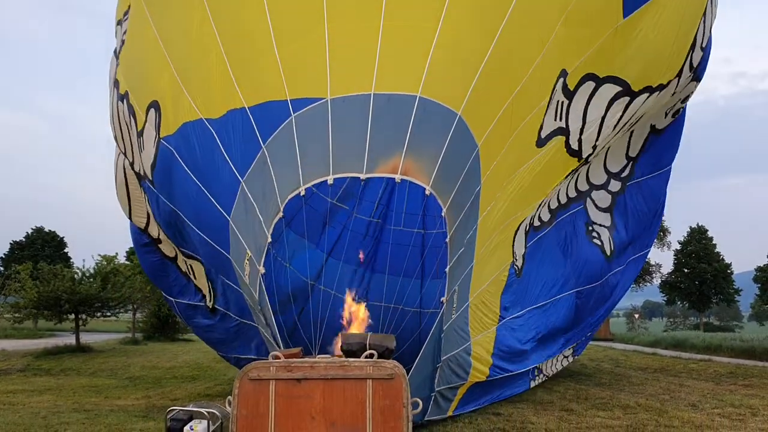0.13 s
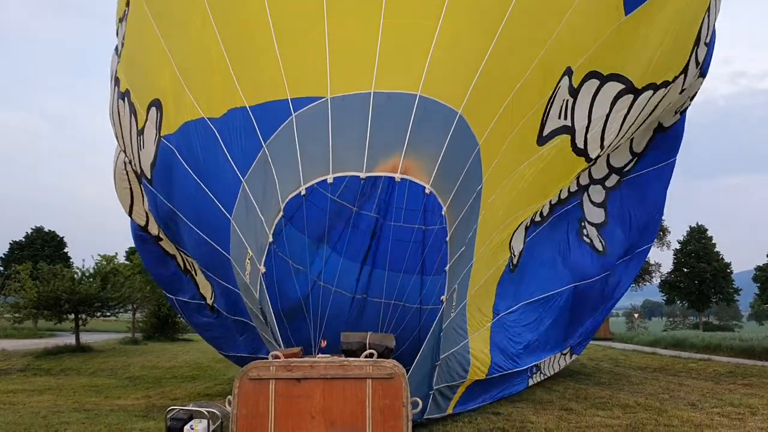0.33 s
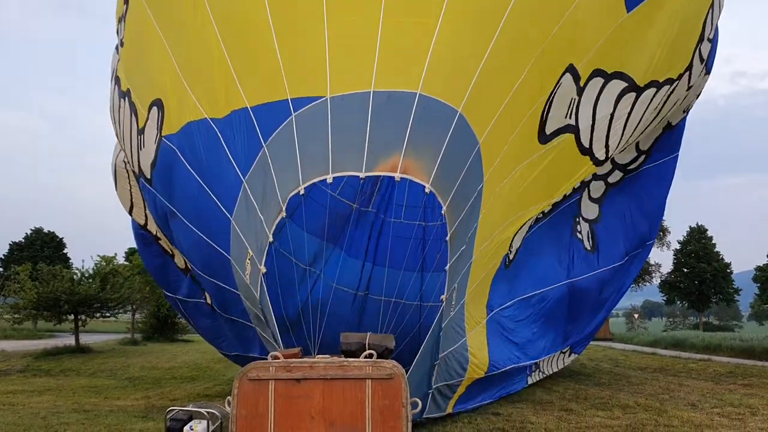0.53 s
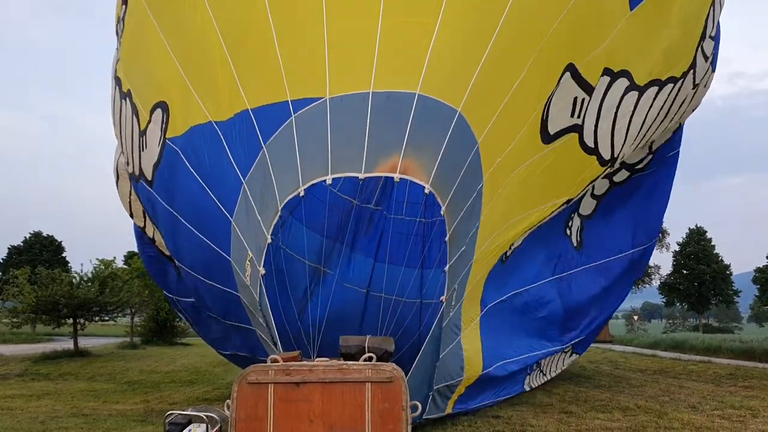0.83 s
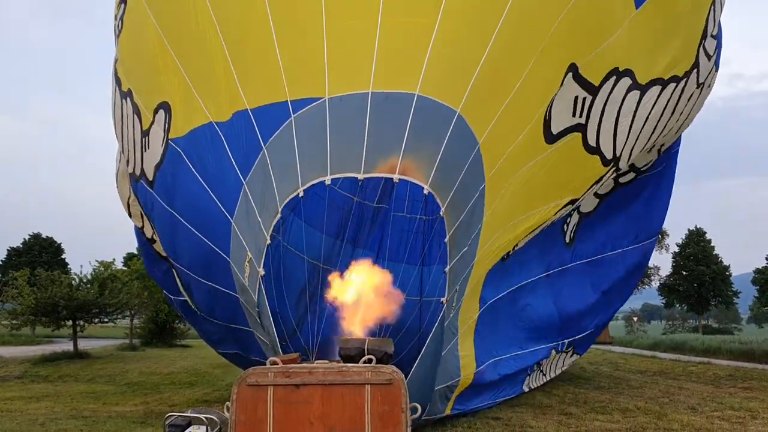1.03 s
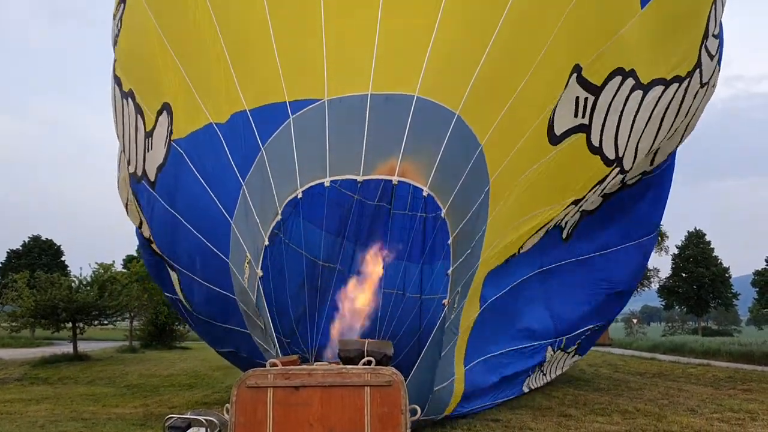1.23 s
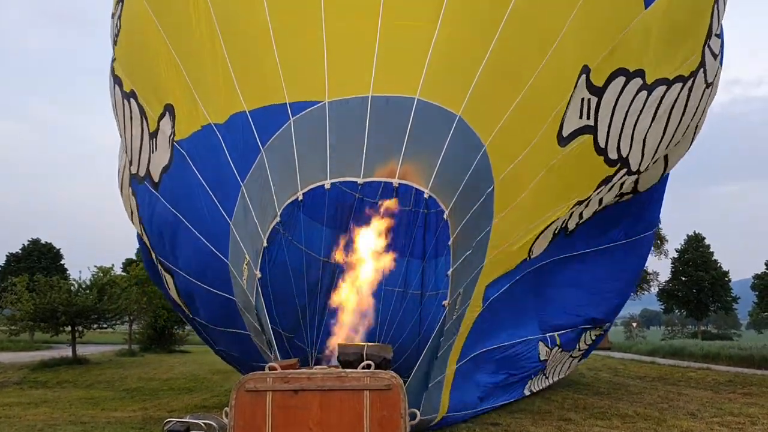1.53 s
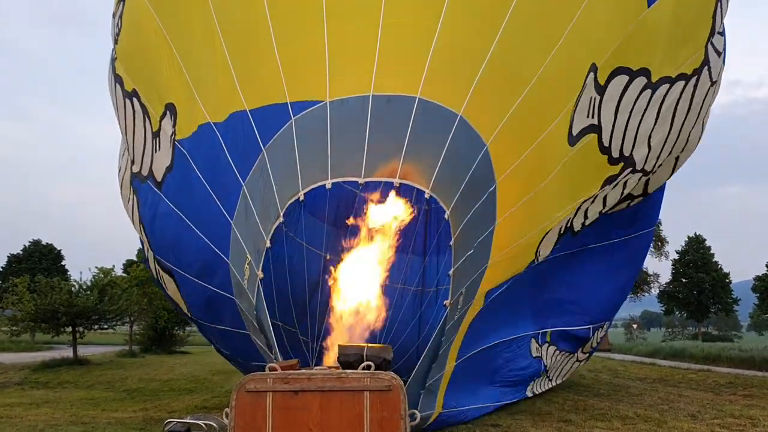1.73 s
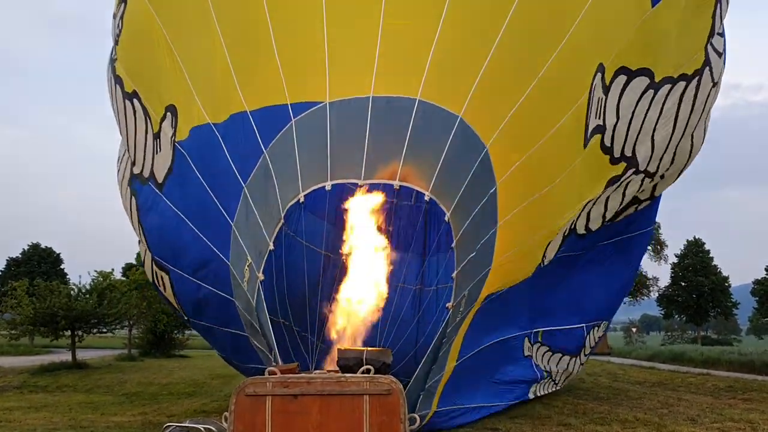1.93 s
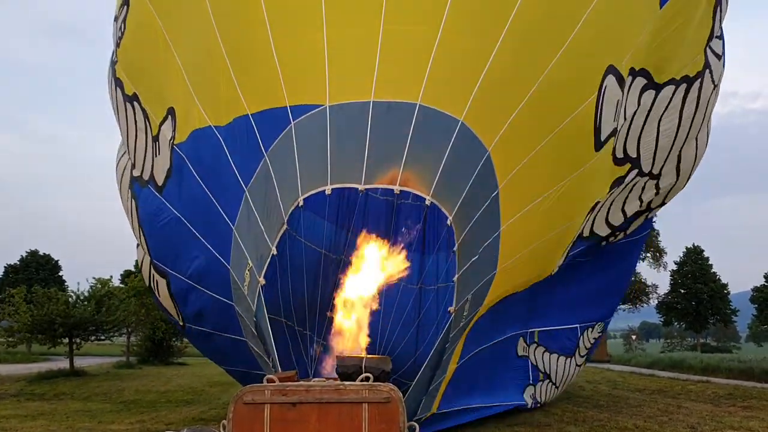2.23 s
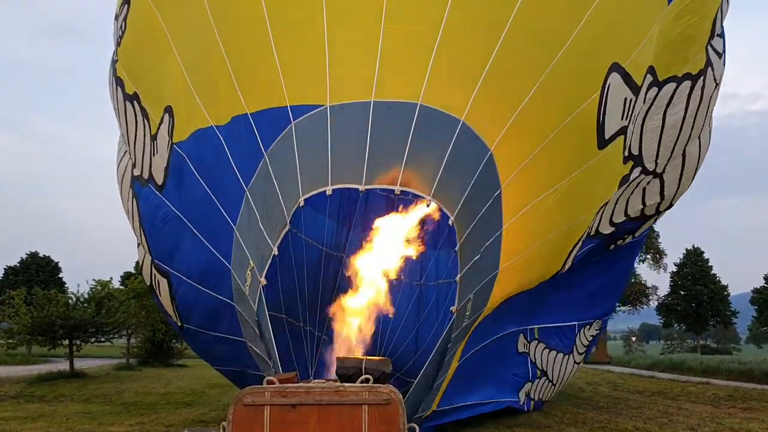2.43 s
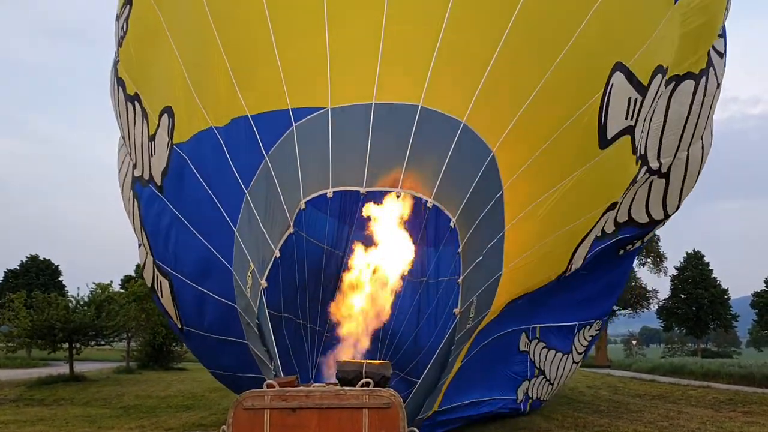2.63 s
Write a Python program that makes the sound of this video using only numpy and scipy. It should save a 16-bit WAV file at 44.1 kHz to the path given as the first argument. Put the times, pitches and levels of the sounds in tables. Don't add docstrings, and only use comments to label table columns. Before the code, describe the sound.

A hot air balloon burner cuts out, reignites with a deep whump and roars beside a droning fan

```python
import sys
import numpy as np
from scipy import signal
from scipy.fft import rfft, irfft
from scipy.io import wavfile

SR = 44100
rng = np.random.default_rng(int(sys.argv[2]) if len(sys.argv) > 2 else 0)


def unload_audio(sound):
    columns = np.transpose(np.atleast_2d(sound))
    steps = np.round(np.clip(columns, -1, 1) * 32767)
    wavfile.write(sys.argv[1], SR, steps.astype(np.int16))


def gain_from_decibels(decibels):
    exponent = np.asarray(decibels, float) / 20
    return 10 ** exponent


N = 122598
TIME = np.arange(N) / SR

# [place / share of cycle, length / share of cycle, level/dB]
CONTACTS = [
    (.06, .04, -6),
    (.2, .022, 0),
    (.27, .02, -6),
    (.36, .025, -7),
    (.45, .022, -1),
    (.55, .03, -11),
    (.71, .022, -2),
    (.87, .03, -5),
    (.94, .025, 0),
]
# [f/Hz, left-right likeness]
FLAME_LIKENESS = [(150, 1), (600, 0.94), (1500, 1), (5000, 0), (14000, 0)]


def rms_one(x):
    return x / np.sqrt(np.mean(x ** 2) + 1e-20)


def in_time(rows):
    return np.interp(TIME, *np.transpose(rows))


def at_hz(points, hz):
    points = np.array(points)
    return np.interp(np.log(hz), np.log(points[:, 0]), points[:, 1])


def drift(rate):
    r = np.exp(-80 * np.pi * rate / SR)
    white = rng.standard_normal(N // 40 + 2002)
    slow = signal.lfilter([1], [1, -2 * r, r * r], white)[2000:]
    return np.interp(np.arange(N) / 40, np.arange(len(slow)), rms_one(slow))


def resonance(x, hz, width_hz):
    r = np.exp(-np.pi * width_hz / SR)
    zeros = np.array([1, 0, -1]) * (1 - r * r) / 2
    poles = [1, -2 * r * np.cos(2 * np.pi * hz / SR), r * r]
    return signal.lfilter(zeros, poles, x + 1e-18)


def pair(mid, side, alike):
    alike = np.clip(alike, 0, 1)
    return np.sqrt(1 + alike) * mid + np.sqrt(1 - alike) * side * [[1], [-1]]


def banded_noise(spectrum, likeness, patchy_db, rate):
    together = drift(rate / 4)
    lowest, highest = spectrum[0][0], spectrum[-1][0]
    edges = lowest * 2 ** np.arange(0, np.log2(highest / lowest) + .4, .4)
    white = rng.standard_normal((2, 2, N + SR // 4))
    out = 0
    for k, (low, high) in enumerate(zip(edges, edges[1:])):
        band = signal.butter(2, [low, high], "band", fs=SR, output="sos")
        mid, side = signal.sosfilt(band, white[k % 2])[:, -N:]
        hz = np.sqrt(low * high)
        flicker_db = patchy_db * (0.81 * together + drift(rate))
        out = out + gain_from_decibels(at_hz(spectrum, hz) + flicker_db) * pair(mid, side, at_hz(likeness, hz))
    return rms_one(out)


def engine_cycles():
    # [t/s, f/Hz]
    blade_rate = [
        (0, 68.83),
        (.8, 68.84),
        (1.0, 69.0),
        (1.35, 69.0),
        (1.6, 68.84),
        (1.9, 68.53),
        (2.2, 68.7),
        (2.45, 68.95),
        (2.78, 69.0),
    ]
    cycles = np.cumsum(in_time(blade_rate)) / SR / 4
    cycle_start_s = .5821
    return cycles - np.interp(cycle_start_s, TIME, cycles) + 20


def strikes(cycles, at):
    passed = np.floor(cycles - at)
    return np.diff(np.maximum.accumulate(passed), prepend=passed[0])


def contact_gate(cycles):
    gate = gain_from_decibels(-11)
    for at, length, db in CONTACTS:
        away = (cycles - at + .5) % 1 - .5
        gate = gate + gain_from_decibels(db + 1.0 * drift(20)) * np.exp(-2 * (away / length) ** 2)
    return gate


def airstream(gate):
    # [f/Hz, level/dB per Hz]
    wash = [(60, -24), (300, -14), (1000, -9), (3000, -8.5), (6000, -13.5), (8500, -16), (11500, -22.5),
            (15500, -23)]
    # [f/Hz, left-right likeness]
    wash_likeness = [(300, .99), (1000, .85), (3000, .7), (15000, .62)]
    throb = rms_one(gate ** 0.36)
    return gain_from_decibels(-35.5) * throb * banded_noise(wash, wash_likeness, patchy_db=0.5, rate=20)


def rattle(cycles, gate):
    # [f/Hz, width/Hz, left level/dB, right level/dB]
    metal_modes = [(822, 220, -1, -4), (1272, 155, 3, -9), (1417, 107, -1.5, 2), (1595, 140, -24, -8),
                   (1998, 194, 5.5, 2.5), (2116, 23, -4, -8), (2496, 50, -1, -7), (2698, 143, -9.5, 0.5),
                   (3063, 120, -1, -10.5), (3736, 250, -2.5, -6)]
    repeats, steps = .4, 2560
    loop = rng.standard_normal((2, steps))
    again = loop[:, (cycles % 1 * steps).astype(int)]
    fresh = rng.standard_normal((2, N))
    mid, side = gate * (np.sqrt(repeats) * again + np.sqrt(1 - repeats) * fresh)
    loose = cycles + .001 * drift(30)
    knocks = sum(gain_from_decibels(db) * strikes(loose, at - length / 2) for at, length, db in CONTACTS)
    knocks = gain_from_decibels(28.5 + 1.0 * drift(43)) * knocks
    grit = pair(mid, side, 0.96) + knocks
    ringing = 0
    for k, (hz, w, left_db, right_db) in enumerate(metal_modes):
        mode = resonance(resonance(grit, hz, w), hz, 2 * w) / np.sqrt(w)
        ringing = ringing + (-1) ** k * gain_from_decibels(np.array([[left_db], [right_db]])) * mode
    return gain_from_decibels(-32) * rms_one(ringing)


def exhaust(cycles):
    # [f/Hz, width/Hz, level/dB]
    pipe_modes = [(82, 40, 5), (183, 14, 2), (230, 46, -3), (296.4, 10.3, 2), (372, 230, -19),
                  (774, 160, -7.5)]
    fired = strikes(cycles, .15) * gain_from_decibels(-1 * drift(17))
    thud = 0
    for k, (hz, w, db) in enumerate(pipe_modes):
        thud = thud + gain_from_decibels(db) * resonance(fired, hz, w) * (-1) ** k
    return gain_from_decibels(-34.5) * rms_one(thud)


def blades(cycles):
    # [multiple of blade rate, level/dB]
    harmonics = [(1, 0), (2, -13.5), (3, -4), (4, -3), (5, -11.5), (6, -20), (7, -21.5), (8, -25),
                 (9, -17.5), (10, -15), (11, -15.5), (12, -21.5), (13, -19.5), (14, -23.5)]
    dip_at, skew, wobble_db = .21, 1.2, .4
    turn = 8 * np.pi * (cycles - dip_at)
    beat = 0
    for k, db in harmonics:
        right_db = 1.5 + 0.11 * k
        lean = gain_from_decibels(np.array([[-.5], [.5]]) * right_db)
        strength = np.sqrt(2) * gain_from_decibels(db + wobble_db * drift(17))
        beat = beat - strength * lean * np.cos(k * turn + skew / k)
    return gain_from_decibels(-25) * beat


def valve(rise_s):
    shut_s, open_s, fall_s = 0.017, 0.86, 0.03
    falling = np.exp(-np.maximum(TIME - shut_s, 0) / fall_s)
    return falling + 1 - np.exp(-np.maximum(TIME - open_s, 0) / rise_s)


def valve_tick():
    tick = np.zeros(N)
    tick[int(.769 * SR)] = gain_from_decibels(-10)
    return resonance(tick, 12500, 3000)


def gas_jet():
    # [f/Hz, level/dB per Hz]
    hiss = [(1500, -11), (3000, 0), (5000, 4.5), (7000, -4), (8500, -1.5), (11800, -3.5), (14000, -5),
            (16000, -0.5)]
    eased_db = -1.5 * np.clip((TIME - 1.6) * 10, 0, 1)
    return gain_from_decibels(-40.5 + eased_db) * valve(.07) * banded_noise(hiss, FLAME_LIKENESS, patchy_db=0.0, rate=17)


def flame_flutter():
    mid, side = resonance(rng.standard_normal((2, N)), 560, 260)
    flutter = pair(mid, side, .95) * gain_from_decibels(2.2 * drift(40))
    return gain_from_decibels(-35) * valve(0.042) ** 2 * rms_one(flutter)


def ignition_whump():
    whump_s, flash_lead_s, whump_hz, t60_s = .8698, .0105, 115, .05
    bangs = np.zeros(N)
    bangs[int(whump_s * SR)] = 1
    bangs[int((whump_s - flash_lead_s) * SR)] = gain_from_decibels(-12)
    r, w = gain_from_decibels(-60 / (t60_s * SR)), 2 * np.pi * whump_hz / SR
    whump = signal.lfilter([0, np.sin(w)], [1, -2 * r * np.cos(w), r * r], bangs + 1e-18)
    return 1.24 * signal.sosfilt(signal.butter(2, 300, fs=SR, output="sos"), whump)


def flame_roar():
    # [t/s, level/dB]
    burning_rate = [(0, -19.5), (.04, -24), (.19, -25.5), (.27, -27), (.33, -51), (.862, -66),
                    (.893, -19.5), (1.0, -20.5), (1.1, -17.5), (1.5, -21), (1.62, -19), (1.75, -21.5),
                    (1.95, -19.5), (2.05, -20.5), (2.22, -21), (2.33, -22), (2.45, -20), (2.78, -20.5)]
    # [f/Hz, level/dB per Hz]
    rumble = [(28, -78), (45, -1), (70, 0), (110, -2.5), (170, -8), (300, -23), (600, -23), (1100, -47.5)]
    return gain_from_decibels(in_time(burning_rate) + 3.5) * banded_noise(rumble, FLAME_LIKENESS, patchy_db=1.0, rate=22)


def burner():
    return flame_roar() + flame_flutter() + gas_jet() + ignition_whump() + valve_tick()


def ports(x, sideways):
    # [f/Hz, lag/ms]
    right_lag = [(300, .09), (1000, .125), (2400, .075), (4300, .107), (5200, .144), (8700, .165),
                 (10300, .145), (14300, .171)]
    # [f/Hz, left-right level/dB]
    shading = [(300, 0.5), (2000, -2), (3500, -6), (5000, -12), (7500, -7.5), (9000, -1.5), (11000, -8),
               (13500, 1.5)]
    # [f/Hz, level/dB]
    cavity = [(6500, 0), (7900, -3), (9500, -1), (11800, 3.5), (13500, 0), (15500, -6)]
    hz = np.fft.rfftfreq(N, 1 / SR) + 1
    late = np.exp(-2j * np.pi * hz * at_hz(right_lag, hz) / 1000)
    lean = gain_from_decibels(sideways * at_hz(shading, hz) / 2)
    return irfft(rfft(x) * gain_from_decibels(at_hz(cavity, hz)) * [lean, late / lean], N)


def scene():
    cycles = engine_cycles()
    gate = contact_gate(cycles)
    fan = airstream(gate) + rattle(cycles, gate) + exhaust(cycles) + blades(cycles)
    return ports(fan, sideways=1) + ports(burner(), sideways=0.85)


def band_limit(x):
    return signal.sosfilt(signal.butter(12, 15700, fs=SR, output="sos"), x)


def record(dry):
    ceiling = .99
    limited = dry / (1 + np.abs(dry / ceiling) ** 8) ** (1 / 8)
    return band_limit(limited)


dry = scene()
out = record(dry)
unload_audio(out)
```